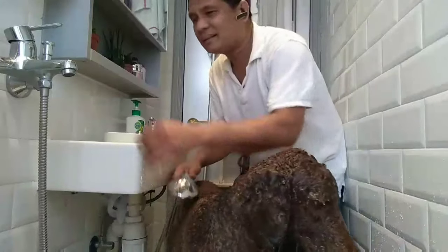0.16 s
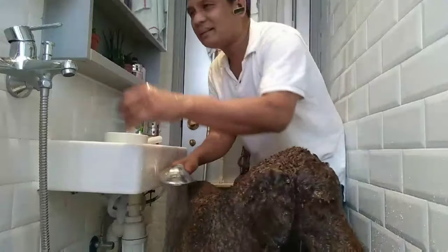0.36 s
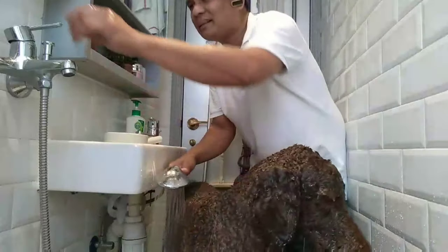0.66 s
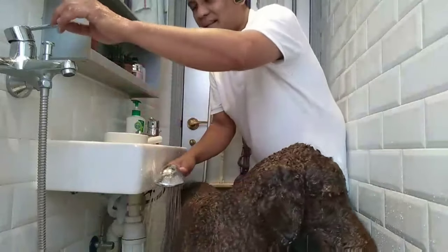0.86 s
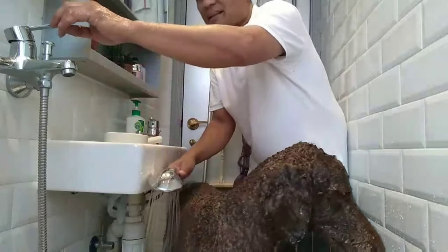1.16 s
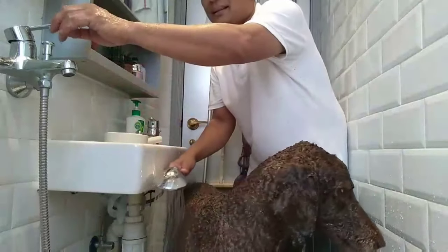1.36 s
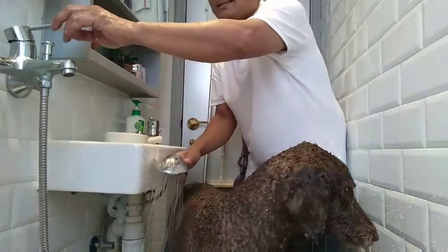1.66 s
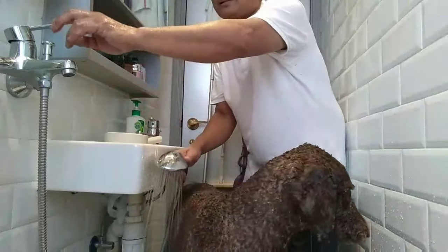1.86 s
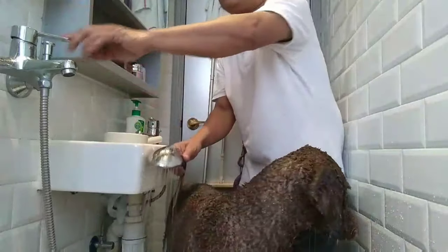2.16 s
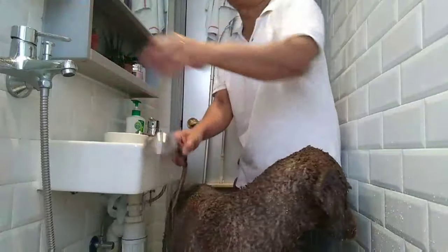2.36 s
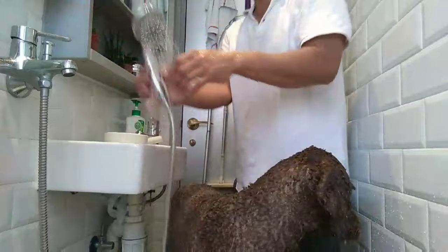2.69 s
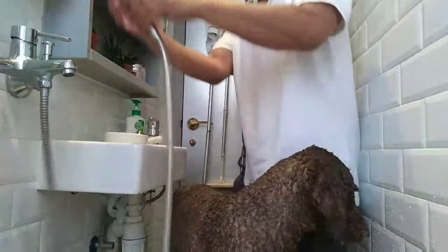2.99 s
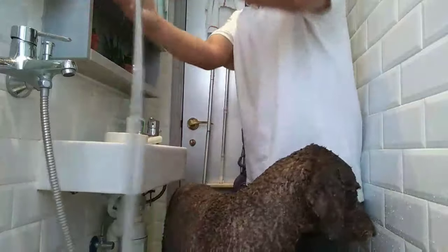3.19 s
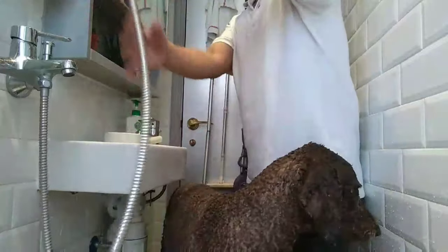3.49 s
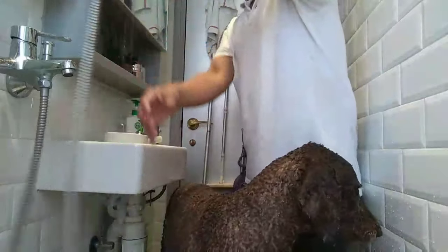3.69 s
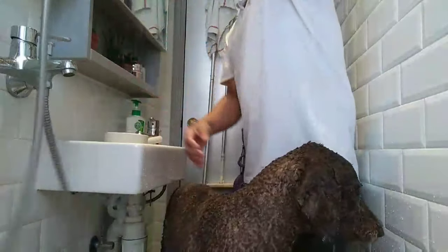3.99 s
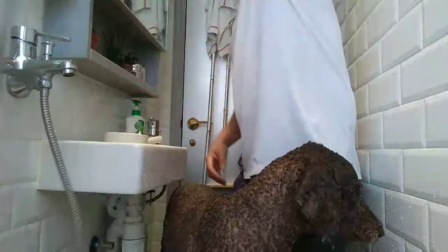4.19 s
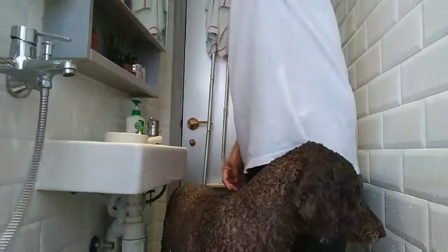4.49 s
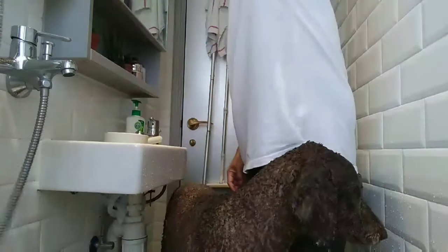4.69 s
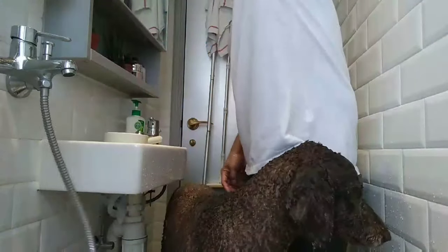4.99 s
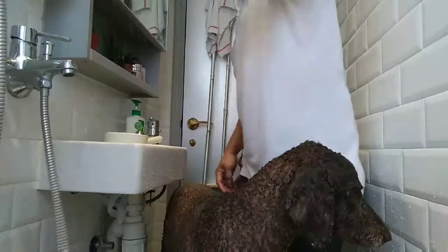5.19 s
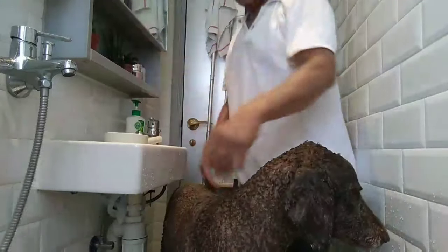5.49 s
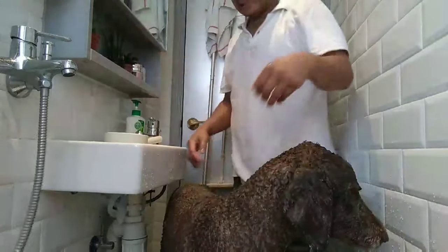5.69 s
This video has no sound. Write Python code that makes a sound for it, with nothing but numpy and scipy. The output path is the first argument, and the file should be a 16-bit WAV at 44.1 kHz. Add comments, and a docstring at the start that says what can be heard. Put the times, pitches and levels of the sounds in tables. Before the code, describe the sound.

Jets of water hiss in surges against a dog's fur, slapping and gurgling onto the floor close by. The flow stops abruptly and the last water dribbles and plips. A wet, ribbed hose ticks and scrapes as it is lifted, and the shower head clatters into its bracket in two ringing clusters. Dull movement bumps continue throughout, with the short, tight reflections of a small tiled bathroom.

```python
"""A hand shower sprays a wet dog in a small tiled bathroom: jets hiss on the coat, run-off splatters
and gurgles. At 2.4 s the tap is shut; the soaked coat fizzes and the last water drips. The hose is
gathered up with wet swishes, scrapes and ticks. From 4.3 s the shower head knocks into its wall
holder, ringing head and bracket. Throughout, body movements thud softly in the room's lowest resonance."""
import sys
import numpy as np
from scipy import signal
from scipy.io import wavfile

SR = 44100
rng = np.random.default_rng(int(sys.argv[2]) if len(sys.argv) > 2 else 0)


def master(y):
    """Save y as 16-bit WAV."""
    cut = np.clip(np.atleast_2d(y).T, -1, 1)
    pcm = np.round(cut * 32767)  # scale
    wavfile.write(sys.argv[1], SR, pcm.astype(np.int16))


N = 257984
T = np.arange(N) / SR
TAP_SHUT_S, SHUTTING_S = 2.39, 0.049  # end of flow, lever travel time
# Spectrum of water slapping a surface. Each row: frequency in Hz, density in dB.
SLAP_SPECTRUM = [(1800, -33), (2700, -3), (4200, -3.5), (7000, -35)]


def gain_of(db):
    """Decibels to amplitude."""
    return 10 ** (np.asarray(db) / 20)


def unit_rms(x):
    """Scale to rms 1."""
    return x / np.sqrt(np.mean(x ** 2) + 1e-20)


def unit_attack(x):
    """Scale to rms 1 over the first 10 ms."""
    return x / np.sqrt(np.mean(x[:SR // 100] ** 2) + 1e-20)


def envelope(points):
    """Gain per sample from (s, dB) points."""
    times_s, levels_db = np.transpose(points)
    return gain_of(np.interp(T, times_s, levels_db))


def surges(depth_db, step_s):
    """Randomly wandering gain."""
    knots = rng.standard_normal(4000)
    return gain_of(depth_db * np.interp(T / step_s, np.arange(len(knots)), knots))


def tap_closed():
    """Ramp from 0 to 1 as the tap shuts."""
    return np.clip(1 + (T - TAP_SHUT_S) / SHUTTING_S, 0, 1)


def fade_after_tap(db, db_per_s):
    """Gain that holds until the tap is shut, then decays."""
    return gain_of(db - db_per_s * np.maximum(T - TAP_SHUT_S, 0))


def add(mix, start_s, sound):
    """Mix a sound in at start_s."""
    part = mix[max(round(start_s * SR), 0):][:len(sound)]
    part += sound[:len(part)]


def colour(x, spectrum, size=8192):
    """Minimum-phase filter from (Hz, dB) points; clicks keep their attack."""
    hz, db = np.transpose(spectrum)
    bins_hz = abs(np.fft.fftfreq(size, 1 / SR))
    log_gain = np.log(gain_of(np.interp(np.log(bins_hz + 1), np.log(hz + 1), db)))
    taps = np.fft.ifft(np.exp(signal.hilbert(log_gain).conj())).real[:size // 2]
    return signal.fftconvolve(x, taps)[:len(x)]


def noise(count, spectrum):
    """Coloured noise, rms 1."""
    return unit_rms(colour(rng.standard_normal(count), spectrum))


def room(x, early_db, tail_db, early_s=0.012, t60_s=0.24):
    """One random path in the tiled room: direct sound, close reflections, tail. Energy is kept."""
    t = np.arange(SR // 2) / SR
    early, tail = rng.standard_normal((2, len(t))) * (t > 0.001)
    early *= np.exp(-t / early_s)
    tail *= np.exp(-np.log(1000) * t / t60_s)
    response = (t == 0) + gain_of(early_db) * early / np.linalg.norm(early)
    response += gain_of(tail_db) * tail / np.linalg.norm(tail)
    wet = signal.fftconvolve(x, response)
    return wet * np.linalg.norm(x) / np.linalg.norm(wet)


def burst(spectrum, decay_s):
    """Brief cluster of contacts dying away."""
    t = np.arange(SR // 5) / SR
    return unit_attack(colour(rng.standard_normal(len(t)) * np.exp(-t / decay_s), spectrum))


def ring(modes, detune=0.0031):
    """Decaying modes, excited differently by each blow and detuned by the grip."""
    t = np.arange(SR // 4) / SR
    out = np.zeros(len(t))
    for hz, db, t60_s in modes:
        decay = gain_of(db + 2 * rng.standard_normal()) * np.exp(-np.log(1000) * t / t60_s)
        gripped_hz = hz * (1 + detune * rng.standard_normal())
        out += decay * np.sin(2 * np.pi * (gripped_hz * t + rng.random()))
    return unit_attack(out)


def patter(spectrum, per_s, spread_db, early_db, tail_db, spots=4):
    """Random impacts, mostly small, on a few spots with separate room paths; rms 1."""
    out = np.zeros(N)
    for _ in range(spots):
        sizes = gain_of(spread_db * np.minimum(rng.exponential(1, N), 4))
        impacts = sizes * rng.choice([-1, 1], N) * (rng.random(N) < per_s / spots / SR)
        out += room(impacts, early_db, tail_db)[:N]
    return unit_rms(colour(out, spectrum))


def bubbles(centre_hz, length_s, scatter, per_s=800, cycles=11, rise=0.047, climb=0.44):
    """Bubble cloud, later ones higher; each rings briefly and rises in pitch near the surface."""
    t = np.arange(SR // 20) / SR
    cloud = np.zeros(round(length_s * SR) + len(t))
    count = max(round(per_s * length_s), 4)
    for when, size, pitch in rng.random((160, 3))[:count]:
        hz = centre_hz * np.exp(scatter * (2 * pitch - 1 + climb * (2 * when - 1)))
        age = t * hz / cycles
        swell = (1 - np.exp(-t * hz)) * np.exp(-age)
        tone = np.sin(2 * np.pi * hz * t * (1 + rise * np.tanh(age)))
        add(cloud, when * length_s * 0.8, size * swell * tone)
    return cloud / np.sqrt(np.sum(cloud ** 2) / (length_s * SR))


def air():
    """Quiet, steady room noise."""
    # Each row: frequency in Hz, density in dB.
    spectrum = [(400, 0.5), (1200, -10.5), (3800, -18), (5600, -15), (8000, -21), (15500, -50)]
    return gain_of(-64.5) * noise(N, spectrum)


def movement(room_hz=101, wall_hz=177.6, swell_s=0.011, roughness=0.4):
    """Shifting weight rumbles and thuds in the room's low resonances; shoves boom in the wall."""
    # Rumble. Each row: frequency in Hz, density in dB.
    rumble = [(25, -29), (62, -9), (100, 2), (130, -9), (205, -13.5), (270, -42.5), (600, -56.5)]
    # Body thuds and shoves on the holder. Each row: centre in seconds, relative level in dB.
    thuds = [(0.488, -43.5), (0.641, -49), (0.892, -51), (2.86, -52), (2.911, -51), (3.02, -53),
             (3.129, -50.5), (3.178, -50.5), (3.402, -49.5), (3.598, -50.5), (3.674, -49), (3.765, -49.5),
             (4.12, -48), (4.285, -47.5), (5.396, -43.5), (5.548, -50), (5.757, -47.5)]
    shoves = [(4.287, -54), (4.843, -54.5)]
    out = gain_of(-52.5) * noise(N, rumble)
    t = np.arange(-SR // 8, SR // 8) / SR
    swell = 1 / np.cosh(t / swell_s)
    for events, hz in (thuds, room_hz), (shoves, wall_hz):
        for centre_s, db in events:
            detune, phase = rng.uniform(-1.01, 1, 2)
            boom = np.sin(2 * np.pi * (hz * (1 + 0.07 * detune) * t + phase))
            thud = swell * (boom + roughness * noise(len(t), rumble))
            thud *= np.linalg.norm(swell) / np.linalg.norm(thud)
            add(out, centre_s + t[0], gain_of(db + 10.5) * thud)
    return out


def coat_fizz():
    """Tiny bubbles burst in the soaked coat, fading once the tap is shut."""
    # Each row: frequency in Hz, density in dB.
    spectrum = [(1500, -12.5), (15500, 1)]
    level = tap_closed() * fade_after_tap(-65, db_per_s=14.5)
    return level * patter(spectrum, per_s=2400, spread_db=8, early_db=10, tail_db=-18)


def plips(cycles=9, rise=0.13):
    """Each drop into the puddle traps a bubble, which rings and glides up."""
    # Each row: start in seconds, level in dB, initial pitch in Hz.
    drops = [(2.388, -60, 1240), (2.652, -64.5, 1970), (3.976, -65, 1480), (4.097, -60, 2830)]
    out = np.zeros(N)
    t = np.arange(SR // 20) / SR
    for start_s, db, hz in drops:
        age = t * hz / cycles
        plip = unit_attack(np.exp(-age) * np.sin(2 * np.pi * hz * t * (1 + rise * np.tanh(age))))
        add(out, start_s, gain_of(db) * room(plip, early_db=6, tail_db=1))
    return out


def hose_swishes(attack_s=0.0095, release_s=0.036):
    """Tiny wet contacts as the last water dribbles out and the hose slides through the hands."""
    # Wet contacts. Each row: frequency in Hz, density in dB.
    spectrum = [(1000, -29), (4400, -15.5), (5600, -3), (7000, -6), (10000, -15), (15500, -23.5)]
    # Pulls on the hose. Each row: start in seconds, length in seconds, level in dB.
    pulls = [(2.97, 0.13, -64.5), (3.196, 0.063, -58.5), (4.13, 0.19, -54.5), (4.281, 0.26, -48),
             (4.668, 0.2, -44), (5.084, 0.022, -46.5), (5.441, 0.072, -55.5)]
    sliding = np.zeros(N)
    for start_s, length_s, db in pulls:
        attack = np.clip((T - start_s) / attack_s, 0, 1)
        release = np.exp(-np.maximum(T - start_s - length_s, 0) / release_s)
        sliding += gain_of(db) * attack * release
    dribble = fade_after_tap(-58.5, db_per_s=17)
    level = tap_closed() * np.hypot(sliding, dribble)
    return level * patter(spectrum, per_s=1500, spread_db=6.5, early_db=2.5, tail_db=-8)


def hose_scrapes(bandwidth_hz=1700, ramp_s=0.0034):
    """Ribs tick past an edge, blurring into a rough band that glides with the hose's speed."""
    # Each row: start in seconds, length in seconds, level in dB, first and last pitch in Hz.
    strokes = [(2.788, 0.063, -62.5, 7040, 3400), (3.091, .11, -57, 2765, 2886),
               (3.782, 0.08, -63, 6800, 8300), (3.848, 0.059, -58.5, 5600, 7200),
               (4.386, 0.032, -45.5, 2600, 4540), (4.419, 0.028, -43, 8340, 7420),
               (4.469, 0.0443, -50.5, 3196, 3680), (4.798, 0.039, -43.5, 2915, 2587),
               (5.656, 0.086, -62, 5670, 6950)]
    lowpass = signal.butter(2, bandwidth_hz / 2, fs=SR)
    out = np.zeros(N)
    for start_s, length_s, db, first_hz, last_hz in strokes:
        t = np.arange(0, length_s, 1 / SR)
        hz = first_hz * (last_hz / first_hz) ** (t / length_s)
        phase = 2 * np.pi * np.cumsum(hz) / SR
        grain = signal.lfilter(*lowpass, rng.standard_normal((2, SR // 4))[:, :len(t)])
        band = unit_rms(grain[0] * np.cos(phase) + grain[1] * np.sin(phase))
        ramp = np.minimum(np.minimum(t, length_s - t) / ramp_s, 1)
        add(out, start_s, gain_of(db) * room(ramp * band, early_db=-7, tail_db=-7))
    stick_slip = unit_rms(surges(depth_db=4, step_s=0.013))
    return out * stick_slip


def ticks():
    """Drips and hose links: a sharp snap and a bright ring with more or less body."""
    # Each row: start in seconds, relative level in dB, ring in Hz, body and snap offsets in dB.
    contacts = [(0.162, -35.5, 7500, -35, -14), (2.428, -43, 6300, -12, -22), (2.486, -36.5, 6100, -5, -31),
                (2.57, -47, 6900, -9, -10), (2.708, -53.5, 6200, -12, 9), (2.955, -44.5, 6800, -16.5, -5),
                (3.02, -49.5, 6600, -23, -6), (3.208, -40, 6650, -12, -23), (3.478, -53.5, 5760, -22, 1),
                (3.975, -62, 7000, -10, 14.5), (4.106, -45, 7400, -23, -0.5), (4.184, -48, 6950, -10, 10),
                (4.93, -39.5, 7260, -15.5, 3.5), (5.344, -44.5, 6640, -34, -7.5),
                (5.541, -50.5, 6500, -11, 7), (5.591, -47, 7100, -29, 2)]
    # Ring spectrum. Each row: multiple of the ring's pitch, density in dB.
    ring_shape = [(0.57, -57), (0.78, 4.5), (0.89, 10), (1.13, 4), (1.6, -23)]
    # Each row: frequency in Hz, density in dB.
    snap_spectrum = [(5500, -50), (8500, 1.5), (15500, -2.5)]
    out = np.zeros(N)
    for start_s, db, hz, body_db, snap_db in contacts:
        tone = burst(np.array(ring_shape) * [hz, 1], decay_s=0.0037)
        body = gain_of(body_db) * burst(SLAP_SPECTRUM, decay_s=0.0092)
        snap = burst(snap_spectrum, decay_s=0.004)
        add(out, start_s, gain_of(db - 5) * room(tone + body, early_db=2, tail_db=5))
        add(out, start_s, gain_of(db + snap_db - 7.5) * room(snap, early_db=-2, tail_db=7.5))
    return out


def gurgles():
    """Water gathers and falls in gulps, making bubble clouds in the coat and drain."""
    # Each row: start in seconds, relative level in dB, pitch in Hz, length in seconds, log-pitch spread.
    gulps = [(0.16, -63.5, 1380, 0.1, 0.12), (0.249, -56.5, 2395, 0.085, 0.26),
             (0.378, -57, 1480, 0.029, 0.083), (0.389, -53.5, 2500, 0.064, 0.37),
             (0.483, -60, 1315, 0.088, 0.11), (0.535, -41, 4420, 0.028, 0.17),
             (0.903, -58.5, 1602, 0.053, 0.11), (1.054, -46, 1490, 0.03, 0.16),
             (1.114, -52.5, 1343, 0.043, .11), (1.317, -57, 887, 0.15, 0.048),
             (1.658, -57.5, 1980, 0.019, 0.12), (1.733, -56, 2135, 0.023, 0.17),
             (1.824, -53, 1500, 0.089, 0.136), (1.853, -53.5, 2780, 0.048, 0.3),
             (2.039, -57.5, 882, .035, 0.033), (2.078, -53.5, 2260, 0.079, 0.25),
             (2.222, -53, 915, 0.071, 0.045), (2.256, -59.5, 2210, 0.047, 0.51),
             (5.788, -67.5, 707, .05, 0.14)]
    out = np.zeros(N)
    for start_s, db, hz, length_s, scatter in gulps:
        cloud = bubbles(hz, length_s, scatter)
        add(out, start_s, gain_of(db + 5) * room(cloud, early_db=-3.5, tail_db=-6))
    return out


def spatters(swell_s=0.0061):
    """Water thrown off the coat slaps down: a quick swell of small impacts that dies away."""
    # Each row: start in seconds, level in dB.
    slaps = [(0.456, -41), (0.634, -41.5), (0.718, -44.5), (0.806, -42.5), (0.833, -47), (1.019, -45.5),
             (1.128, -41), (1.181, -51), (1.24, -53), (1.33, -40.5), (2.475, -48)]
    out = np.zeros(N)
    age = np.arange(SR // 5) / SR / swell_s
    for start_s, db in slaps:
        impacts = rng.standard_normal(len(age)) * age * np.exp(-age)
        slap = unit_attack(colour(impacts, SLAP_SPECTRUM))
        add(out, start_s, gain_of(db) * room(slap, early_db=-6, tail_db=-9))
    return out


def slosh(level, per_s=30, low_hz=1245, high_hz=3400):
    """Random gulps of run-off, each a loose cloud of bubbles of many sizes."""
    out = np.zeros(N)
    for when, pitch, size in rng.random((round(per_s * N / SR), 3)):
        hz = low_hz * (high_hz / low_hz) ** pitch
        cloud = bubbles(hz, length_s=0.05, scatter=0.265, per_s=1200, cycles=5.2, rise=0.037)
        add(out, when * N / SR, level[int(when * N)] * size * cloud)
    return room(out, early_db=6, tail_db=0)[:N]


def holder_knocks():
    """The shower head strikes, bounces and seats, ringing; hard blows shake bracket and wall."""
    # Each row: start in seconds, relative level in dB, bracket and head-ring offsets in dB.
    knocks = [(4.277, -27, -15, 1), (4.287, -30, -9.5, -5), (4.309, -32, -25, -14),
              (4.331, -33.5, -13, -10), (4.635, -39.5, -14, 4.5), (4.657, -33.5, -5, 7), (4.672, -24, 1, 0),
              (4.758, -36.5, -29, -8), (4.78, -38.5, -32, -9), (4.799, -38.5, -25, 4.5),
              (4.825, -31, -32, -1.5), (4.836, -39, -10, -3), (4.851, -34, -3, -16),
              (5.094, -43.5, -14, -5)]
    # Each row: frequency in Hz, level in dB, T60 in seconds.
    head_modes = [(3090, -2.5, .12), (4290, -3, 0.21), (4470, 7.5, .12), (4670, 4, 0.13), (4766, 5, 0.13),
                  (4790, 6, 0.13), (6300, 0, 0.23)]
    bracket_modes = [(389, -9, 0.11), (851, -4.5, 0.13), (1075, 1, 0.14), (1264, 3.5, 0.13),
                     (1470, -6, 0.11), (1810, -2, 0.14), (2400, 5.5, 0.057), (3200, -6, 0.12),
                     (3927, -1, .13), (4870, 6.5, 0.086), (5670, -6, 0.14), (6160, 8.5, 0.1)]
    # Contact crack and wall thump. Each row: frequency in Hz, density in dB.
    crack_spectrum = [(500, -37), (1300, -11.5), (2800, 1.5), (3700, -1.5), (4600, 3.5), (6300, 0),
                      (10500, -12), (15500, -23)]
    thump_spectrum = [(150, -20), (370, -3), (640, -21.5), (1000, -1.5), (6500, -3.5), (9000, -37)]
    out = np.zeros(N)
    for start_s, db, bracket_db, head_db in knocks:
        crack = burst(crack_spectrum, decay_s=0.0069)
        thump = gain_of(bracket_db - 4) * burst(thump_spectrum, decay_s=0.018)
        head = gain_of(head_db - 5.5) * ring(head_modes)
        bracket = gain_of(bracket_db - 4.5) * ring(bracket_modes)
        add(out, start_s, gain_of(db - 1) * room(crack + thump, early_db=5, tail_db=-2.5))
        add(out, start_s, gain_of(db - 1) * room(head + bracket, early_db=-5, tail_db=-23))
    return out


def shower(full_aim_db=-34, mist_exponent=2.56, nozzle_turn_s=0.51):
    """Jets hiss on the coat, throwing mist when they hit squarely; run-off splatters on the floor."""
    # Jet impact as the aim shifts, and run-off flow. Each row: time in seconds, level in dB.
    aim_curve = [(0.03, -45), (0.39, -45.5), (0.57, -33.5), (0.85, -35), (0.98, -37), (1.33, -35.5),
                 (1.41, -44.5), (1.48, -54), (1.54, -54.5), (1.77, -59), (1.81, -48), (1.9, -54),
                 (2.04, -51), (2.07, -42), (2.14, -54), (2.36, -53)]
    runoff_curve = [(0.03, -55), (0.47, -52), (0.85, -55), (1.12, -44.5), (1.36, -48), (1.46, -50.5),
                    (1.56, -59), (1.76, -53.5), (1.87, -53.5), (2.11, -49), (2.36, -56.5)]
    # Each row: frequency in Hz, density in dB.
    spray_spectrum = [(2500, -51), (4200, -11.5), (4900, -4), (5300, 2.5), (6200, 5), (7500, -1),
                      (9000, -12), (12500, -65)]
    splatter_spectrum = [(500, -19), (900, -2.5), (1100, -12.5), (1400, 2), (1900, -5.5), (2800, 5),
                         (4400, 3), (9000, -12.5), (15500, -9)]
    # Fine, bright hiss; above about 12 kHz it falls away steeply. Same columns.
    bright_hiss_spectrum = [(6000, -19.5), (8500, 9), (10000, 6.5), (11800, 1), (13200, -18), (15500, -21)]
    flow = 1 - tap_closed()
    aim = envelope(aim_curve) * surges(depth_db=1.75, step_s=0.05)
    runoff = flow * envelope(runoff_curve) * surges(depth_db=1, step_s=0.05)
    thrown = gain_of(-41) * (aim / gain_of(full_aim_db)) ** mist_exponent
    nozzle = gain_of(-61.5) * np.minimum(T / nozzle_turn_s, 1)  # its own fizz, turning into the open
    spray = aim * patter(spray_spectrum, per_s=1500, spread_db=3.5, early_db=3.5, tail_db=-9.5)
    bright_hiss = patter(bright_hiss_spectrum, per_s=2600, spread_db=8.5, early_db=2.5, tail_db=3)
    bright_hiss *= np.hypot(thrown, nozzle)
    splatter = runoff * patter(splatter_spectrum, per_s=500, spread_db=4, early_db=12.5, tail_db=-19)
    return flow * (spray + bright_hiss) + splatter + gain_of(-4.5) * slosh(runoff)


def scene():
    """Mono sum of all sources."""
    mix = air() + shower() + spatters() + plips() + coat_fizz()
    mix += hose_swishes() + hose_scrapes() + gurgles() + ticks() + holder_knocks() + movement()
    return mix[None]


def record(dry, cutoff_hz=15600):
    """Steep low-pass band limit."""
    lowpass = signal.firwin(511, cutoff_hz, window=("kaiser", 9), fs=SR)
    return signal.oaconvolve(dry, lowpass[None], "same")


dry = scene()
out = record(dry)
master(out)
```